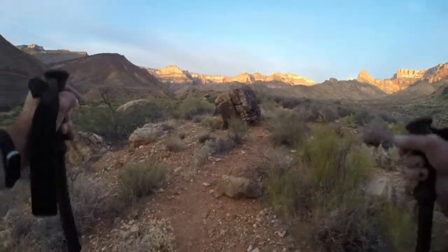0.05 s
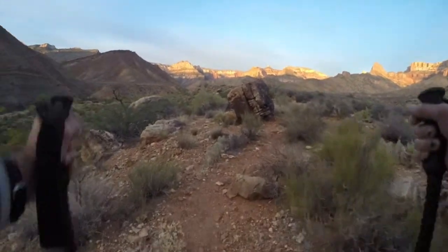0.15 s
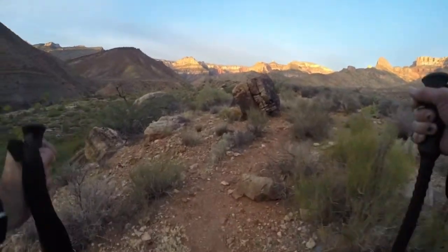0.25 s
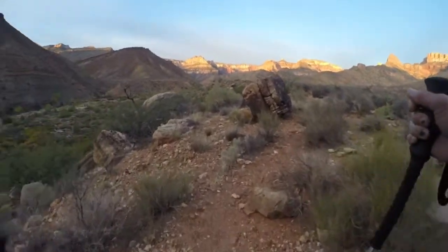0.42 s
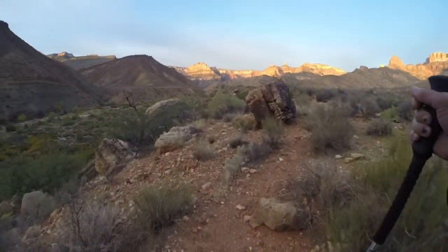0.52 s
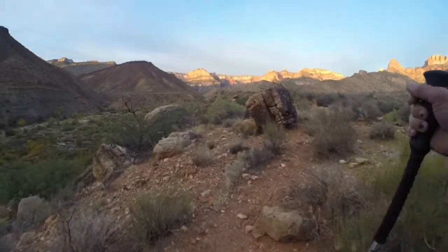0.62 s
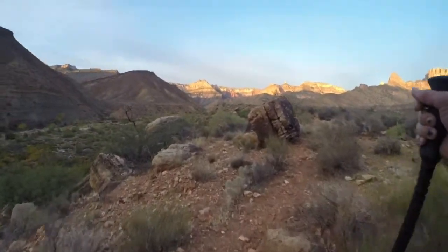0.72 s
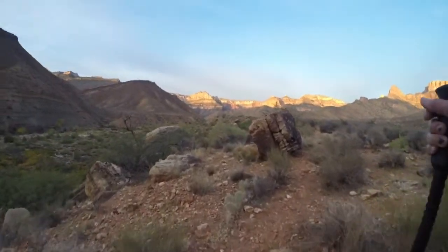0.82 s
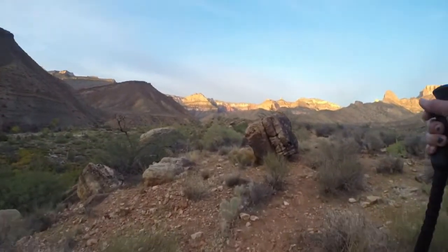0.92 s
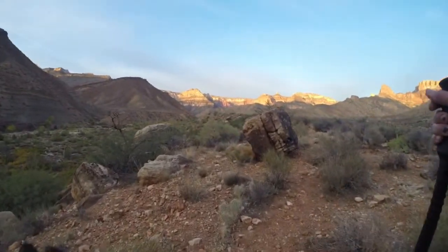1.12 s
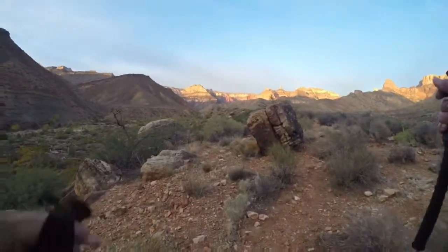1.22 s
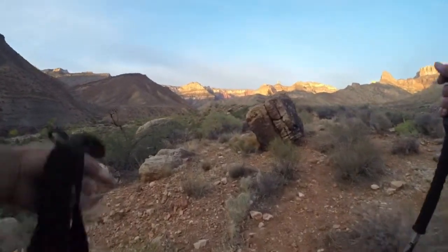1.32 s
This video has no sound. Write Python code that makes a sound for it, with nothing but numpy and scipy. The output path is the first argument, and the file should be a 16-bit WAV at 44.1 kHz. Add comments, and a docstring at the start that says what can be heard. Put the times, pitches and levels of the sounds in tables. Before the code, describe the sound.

A trekking pole strikes stony ground with a hollow thud, amid footsteps crunching on gravel.

```python
"""A hiker's trekking pole strikes a stony desert trail, heard from a body-worn camera.
The hard tip scrapes into grit, then the loaded pole jolts and rings with a hollow thud.
Boots thump, knock and grind loose stones, crunch fine gravel and kick up sand.
Clothing rustles with the stride, and a light wind bumps the microphone."""
import sys
import numpy as np
from scipy import signal
from scipy.fft import rfft, irfft, next_fast_len
from scipy.io import wavfile

SR = 44100
rng = np.random.default_rng(int(sys.argv[2]) if len(sys.argv) > 2 else 0)


def master_out(mix):
    """Clip the mix to full scale and print it as 16-bit PCM to the path in sys.argv[1]."""
    frames = np.transpose(np.atleast_2d(mix))
    ceiling = np.clip(frames, -1, 1)
    pcm = np.round(ceiling * 32767).astype(np.int16)
    wavfile.write(sys.argv[1], SR, pcm)


N = 59535


def amp(db):
    """Turn decibels into a gain."""
    return 10 ** (np.asarray(db) / 20)


def unit(x):
    """Scale to an energy of 1."""
    return x / np.sqrt(np.sum(x ** 2) + 1e-18)


def add(out, at, x):
    """Mix x into out, starting at a time in seconds."""
    i = max(int(at * SR), 0)
    out[i:i + len(x)] += x[:max(N - i, 0)]


def curve(rows):
    """Join (t/s, level/dB) points into a gain over time."""
    return amp(np.interp(np.arange(N) / SR, *np.array(rows).T))


def fade(t, fade_s):
    """Die away by 60 dB in fade_s seconds."""
    return np.exp(-np.log(1000) * t / fade_s)


def colour(x, points):
    """Shape the tone of x with (f/Hz, level/dB) points; the result has an energy of 1."""
    size = 2 * next_fast_len(len(x))
    hz, db = np.array(points).T
    bin_hz = np.arange(size // 2 + 1) * SR / size
    log_gain = np.log(amp(np.interp(np.log(bin_hz + 1), np.log(hz), db)))
    # build the filter so that it never sounds before its input
    cepstrum = irfft(log_gain)
    cepstrum[1:size // 2] *= 2
    cepstrum[size // 2 + 1:] = 0
    response = np.exp(rfft(cepstrum))
    return unit(irfft(rfft(x, size) * response)[:len(x)])


def swells(rows, points):
    """Noise with the given tone that rises and falls in bell shapes."""
    t = np.arange(N) / SR
    gain = sum(amp(db) * np.exp(-np.square((t - at) / half)) for at, db, half in rows)
    return gain * colour(rng.standard_normal(N), points) * np.sqrt(N)


def grains(count, per_s, spread_db=3.5):
    """Tiny random clicks, a few much stronger than the rest."""
    hit = rng.random(count) < per_s / SR
    strength = amp(spread_db * np.minimum(rng.exponential(size=count), 5))
    return hit * strength * rng.choice([-1, 1], count)


def grind(t, length):
    """A short run of clicks as two rough faces slip."""
    friction = grains(len(t), per_s=2700) + 0.15 * rng.standard_normal(len(t))
    return unit(friction * np.exp(-(t / length) ** 4))


# weight on the gravel: t/s, level/dB
CRUNCH = [(0, -48.5), (.09, -55.5), (.16, -45.5), (.19, -42.5), (.23, -44), (.27, -32.5), (.32, -40.5),
          (.39, -47), (.45, -35.5), (.49, -43.5), (.59, -43), (.66, -53), (.77, -46.5), (.81, -43.5),
          (.89, -35), (.94, -46.5), (1.06, -54), (1.2, -47), (1.27, -64.5), (1.35, -45.5)]
# tone of the gravel: f/Hz, level/dB
GRAVEL_TONE = [(60, -8), (150, -5), (280, -4), (550, -4), (900, 6), (1300, -8.5), (1700, -8.5),
               (2300, -12.5), (3000, -6.5), (4200, -33), (6500, -19), (8000, -40), (12000, -43),
               (15000, -48)]


def gravel():
    """Small grains crunch as weight rolls over the ground."""
    return colour(grains(N, per_s=1700), GRAVEL_TONE) * np.sqrt(N) * curve(CRUNCH)


# rustle of clothing and pack: t/s, level/dB
RUSTLE = [(0, -59.5), (.15, -56), (.22, -47.5), (.33, -56), (.52, -56.5), (.6, -50.5), (.72, -54),
          (.85, -52.5), (.98, -46), (1.1, -53), (1.17, -48.5), (1.23, -51), (1.28, -68), (1.35, -60.5)]
# tone of the fabric: f/Hz, level/dB
FABRIC_TONE = [(200, -1), (900, 0), (1600, 4), (2400, 0.5), (3400, 4.5), (4600, 0), (5500, -7.5),
               (6600, -10), (8000, -41), (11000, -44), (15000, -28)]


def rustle():
    """Fabric rubs with the stride, so many tiny clicks that they blur."""
    return colour(grains(N, per_s=20000), FABRIC_TONE) * np.sqrt(N) * curve(RUSTLE)


# tone of the open air: f/Hz, level/dB
AIR_TONE = [(20, -1.5), (50, 1.5), (100, -8), (300, -14), (900, -17), (2000, -26.5), (6000, -29.5),
            (9000, -36), (15000, -44)]
# puffs of wind: t/s, level/dB, half length/s
PUFFS = [(.16, -48.5, 0.036), (.29, -51, 0.031), (.41, -52, 0.16), (.55, -41.5, 0.038), (.71, -52.5, .04),
         (.96, -49.5, 0.11)]
# tone of a puff: f/Hz, level/dB
PUFF_TONE = [(10, -9.5), (28, -2), (45, -10), (80, -13.5), (200, -32), (600, -68), (3000, -84)]


def wind(air_db=-53.5):
    """Faint open air, and low puffs that bump the microphone."""
    air = amp(air_db) * colour(rng.standard_normal(N), AIR_TONE) * np.sqrt(N)
    return air + swells(PUFFS, PUFF_TONE)


# stones under boots and poles: t/s, level/dB, f/Hz, grind length/s, grind above knock/dB
STONES = [(0.046, -40.5, 2400, 0.0049, 18), (0.0668, -38.5, 3240, 0.0059, 9),
          (0.101, -42.5, 2000, 0.0054, 4), (0.11, -39.5, 2760, 0.007, 23), (0.1236, -31.5, 850, 0.0022, -6),
          (0.1272, -30.5, 885, 0.012, -5.5), (0.1697, -33, 1300, 0.0013, 4), (0.19, -42, 1540, .004, 1),
          (0.2672, -24.5, 720, 0.0028, 1), (0.2701, -25.5, 790, 0.0062, 6), (0.339, -44, 2400, 0.0017, -2),
          (0.364, -34.5, 950, 0.0017, 2), (0.377, -45, 2180, 0.0044, 2), (0.425, -25.5, 790, 0.0018, -10),
          (0.426, -30, 1570, 0.0041, 5), (0.449, -29, 1670, 0.006, 18), (0.463, -32.5, 1400, 0.0049, -6),
          (0.469, -31.5, 2820, 0.0034, 2), (0.516, -33, 930, 0.0026, 3), (0.5472, -34, 777, 0.0013, -2.5),
          (0.672, -36, 940, 0.0019, -11), (0.73, -30, 947, 0.0032, -7), (0.751, -43.5, 1650, 0.0062, 10),
          (0.799, -32, 2030, 0.0021, 5), (0.808, -38, 2100, 0.0022, 5), (0.815, -33, 1470, 0.0033, 6),
          (0.823, -43, 2000, .002, -3), (0.83, -43, 2400, 0.0066, 4), (0.8404, -28.5, 2390, 0.0024, -5),
          (0.8553, -29.5, 2200, 0.0025, 4), (0.867, -15, 1930, 0.0023, -9), (0.8692, -22, 1330, 0.0051, 11),
          (0.8768, -20.5, 1890, 0.0039, 29), (0.8809, -21, 820, 0.0015, -1),
          (0.8908, -28, 1820, 0.0032, 13), (0.903, -33.5, 1750, 0.014, 5), (0.9093, -28.5, 1800, 0.0027, 0),
          (0.9125, -25, 2160, 0.01, 2.5), (0.9996, -32.5, 1980, 0.0043, 14),
          (1.1831, -26, 1230, .002, -4.5), (1.3288, -44, 910, 0.0045, 7), (1.339, -47, 1400, 0.0026, 15),
          (1.346, -38.5, 383, 0.005, -3)]
# tone of a grinding stone: multiple of its pitch, level/dB
STONE_TONE = [(.03, -27), (.15, -16.5), (.45, -3.5), (.8, 1), (1.1, 3), (1.55, -5.5), (2.1, -16),
              (3.2, -36.5), (5, -53), (16, -58)]


def stones(knock_half_cycles=0.91, grit_db=-6, grit_fade_s=0.046):
    """Each stone gives a dead knock of a cycle or two and grinds briefly with a trickle of grit."""
    out, t = np.zeros(N), np.arange(SR // 10) / SR
    for at, db, hz, length, grind_db in STONES:
        grit = unit(rng.standard_normal(len(t)) * fade(t, grit_fade_s))
        tone = [(hz * multiple, gain_db) for multiple, gain_db in STONE_TONE]
        slip = colour(grind(t, length) + amp(grit_db) * grit, tone)
        cycles = t * hz - 1.8 * knock_half_cycles  # counted from the middle of the knock
        knock = unit(np.sin(2 * np.pi * cycles) * np.exp(-np.square(cycles / knock_half_cycles)))
        stone = unit(knock + amp(grind_db) * slip)
        add(out, at, stone * amp(db) * np.sqrt(length * SR))  # a longer grind has more energy
    return out


# sprays of sand: t/s, level/dB, half length/s
SPRAYS = [(.07, -49, .004), (.228, -42, 0.0057), (.265, -46.5, 0.026), (.289, -36, 0.008),
          (.315, -49, 0.038), (.458, -41.5, .016)]
# tone of sand and single grains: f/Hz, level/dB
SAND_TONE = [(500, -15), (2000, 4), (3200, 10), (4800, 1), (6500, 0), (8000, -7.5), (11500, -20.5),
             (14500, -16), (16000, -8.5)]


def sand():
    """Fine sand is kicked up in short hisses."""
    return swells(SPRAYS, SAND_TONE)


# thumps of boots and pack: t/s, level/dB, half length/s
THUMPS = [(.132, -36, 0.011), (.28, -36.5, 0.021), (.55, -43.5, 0.0049), (.595, -45.5, 0.031),
          (.81, -43.5, 0.018), (.872, -34, 0.0041), (1.085, -47.5, 0.022)]
# tone of a thump: f/Hz, level/dB
THUMP_TONE = [(30, -9), (70, -4.5), (140, -5), (350, -2.5), (550, 0), (900, -26.5), (3000, -51),
              (10000, -73)]


def thumps():
    """Boots and pack thump with short, dull swells of noise."""
    return swells(THUMPS, THUMP_TONE)


# sharp ticks of grit: t/s, level/dB
TICKS = [(0.1680, -41), (0.3624, -40), (0.426, -36.5), (0.4501, -36), (0.4715, -34.5), (0.549, -43.5),
         (0.688, -43), (0.7313, -40.5), (0.8673, -34.5), (0.893, -46), (1.002, -39)]


def ticks(fade_s=0.014):
    """Single grains snap out from under the sole."""
    out, t = np.zeros(N), np.arange(SR // 20) / SR
    for at, db in TICKS:
        snap = colour(rng.standard_normal(len(t)) * fade(t, fade_s), SAND_TONE)
        add(out, at, snap * amp(db) * np.sqrt(SR / 1000))  # the energy of 1 ms at this level
    return out


# the pole tip biting into grit: t/s, level/dB, length/s
SCRAPES = [(0.2401, -19, 0.002), (0.2430, -22, 0.0066), (0.2470, -20, 0.0027)]
# tone of the tip: f/Hz, level/dB
TIP_TONE = [(150, -28), (800, -5.5), (1250, -15.5), (1700, -1.5), (2300, -10), (2950, 0), (3500, -7),
            (5000, -15.5), (6300, -11.5), (7700, -24.5), (11500, -35.5), (13800, -23.5), (16000, -29)]


def pole_tip(bite_db=-7, tail_db=-2, tail_fade_s=0.02):
    """The hard tip bites with a click and skids over grit with a bright rasp."""
    out, t = np.zeros(N), np.arange(SR // 10) / SR
    bite = amp(bite_db) * (t == 0)
    for at, db, length in SCRAPES:
        skid = grind(t, length)
        tail = amp(tail_db) * unit(rng.standard_normal(len(t)) * fade(t, tail_fade_s))
        rasp = colour(bite + skid + tail, TIP_TONE)
        add(out, at, rasp * amp(db) * np.sqrt(length * SR))
    return out


# jolts of the planted pole: t/s, level/dB, contact time/s
JOLTS = [(0.279, -14.5, 0.00013), (0.2829, -2, 0.00062), (0.287, -5.5, 0.00038), (0.2893, -6.5, 0.00045),
         (0.2911, -9, 0.00034), (0.3064, -19.5, 0.00034)]
# notes that pole and grip ring with: f/Hz, level/dB, fade time/s
POLE_NOTES = [(170, -18, 0.057), (448, -15.5, 0.023), (548, -0.5, 0.038), (835, -10.5, 0.052),
              (902, -6, 0.054), (990, -9.5, 0.006), (1230, -4.5, 0.017), (1558, 3.5, 0.018),
              (1760, -10.5, 0.021), (1890, -32, 0.006), (2880, -0.5, .018), (3580, 1, 0.011)]
# tone of the crack in each jolt: f/Hz, level/dB
CRACK_TONE = [(50, -15), (170, -4.5), (300, -20.5), (500, 0), (1200, -6.5), (1800, -1.5), (3000, -5.5),
              (4500, -15), (6500, -9.5), (9000, -13), (15000, -16)]


def pole_thud(crack_db=-5, crack_fade_s=0.017):
    """The loaded pole chatters; each jolt makes it ring, duller when the contact lasts longer."""
    out, t = np.zeros(N), np.arange(SR // 5) / SR
    notes = [amp(db) * np.cos(2 * np.pi * hz * t) * fade(t, fade_s) for hz, db, fade_s in POLE_NOTES]
    ring = unit(sum(notes))
    for at, db, contact in JOLTS:
        crack = colour(rng.standard_normal(len(t)) * fade(t, crack_fade_s), CRACK_TONE)
        push = np.square(t) * fade(t, contact)
        blow = signal.fftconvolve(ring + amp(crack_db) * crack, push)[:len(t)]
        add(out, at, unit(blow) * amp(db) * np.sqrt(SR / 1000))  # the energy of 1 ms at this level
    return out


def scene():
    """Everything is close and free of echo in the open desert."""
    mix = gravel() + rustle() + wind() + stones() + sand() + thumps() + ticks() + pole_tip() + pole_thud()
    return mix[None]


def record(dry):
    """The camera cuts the top of the treble."""
    top_hz = 15100
    return signal.sosfilt(signal.ellip(8, .2, 70, top_hz, fs=SR, output="sos"), dry)


dry = scene()
out = record(dry)
master_out(out)
```